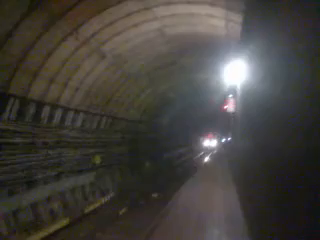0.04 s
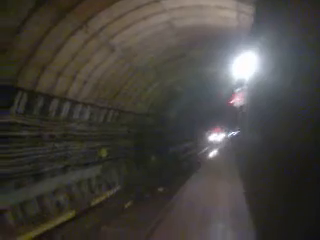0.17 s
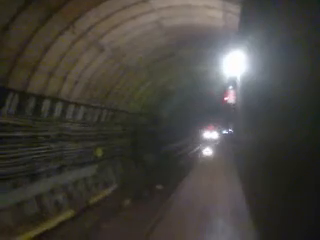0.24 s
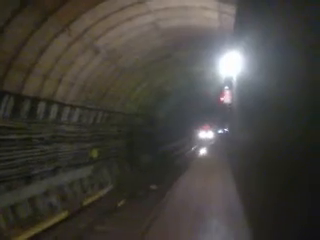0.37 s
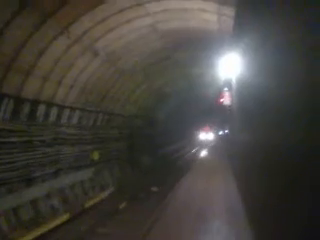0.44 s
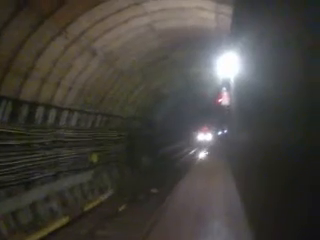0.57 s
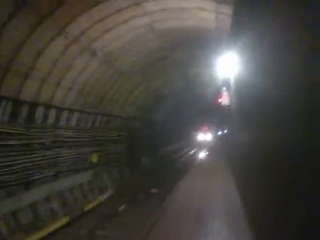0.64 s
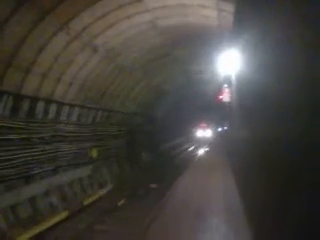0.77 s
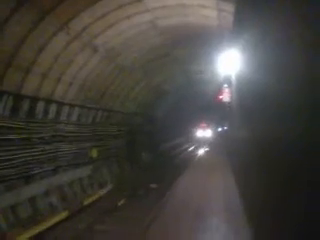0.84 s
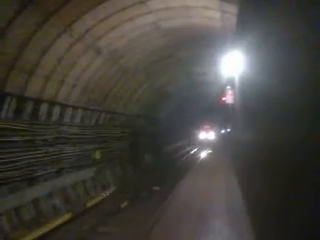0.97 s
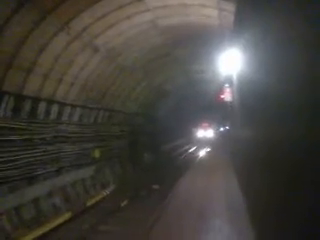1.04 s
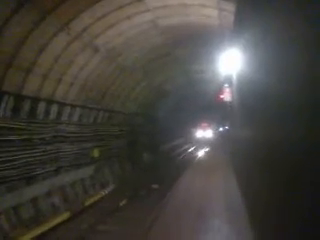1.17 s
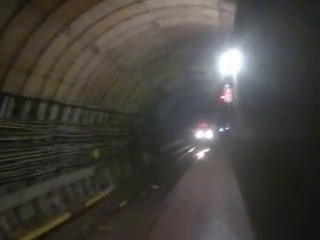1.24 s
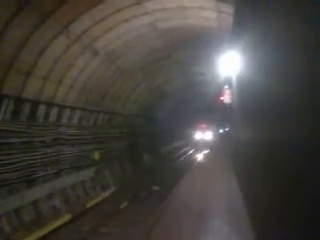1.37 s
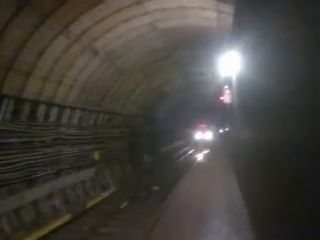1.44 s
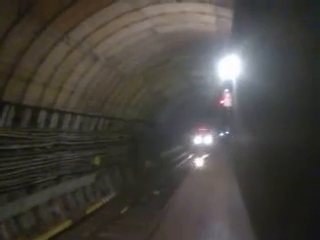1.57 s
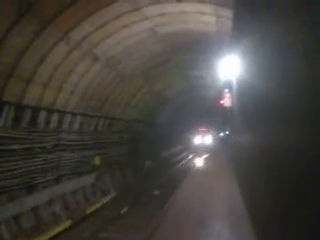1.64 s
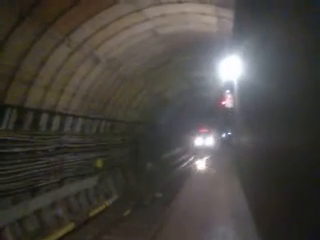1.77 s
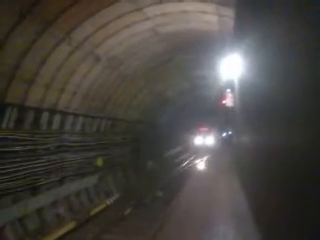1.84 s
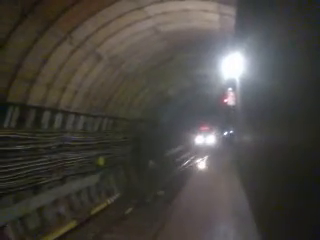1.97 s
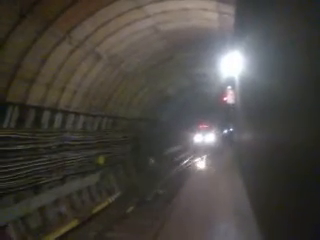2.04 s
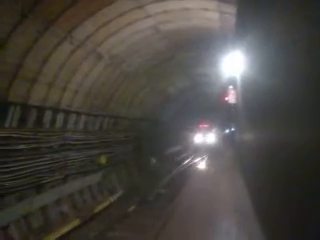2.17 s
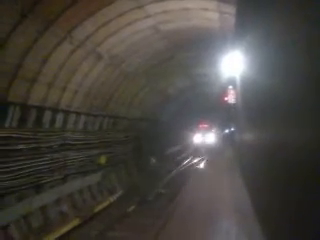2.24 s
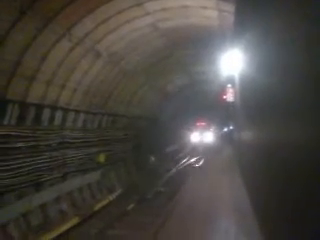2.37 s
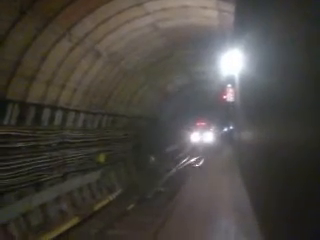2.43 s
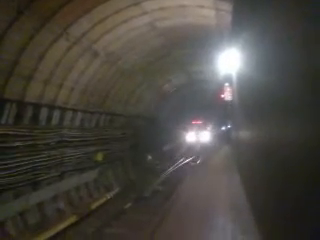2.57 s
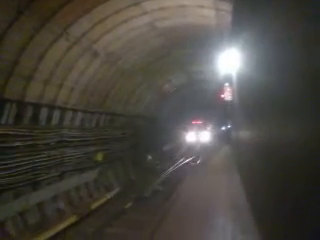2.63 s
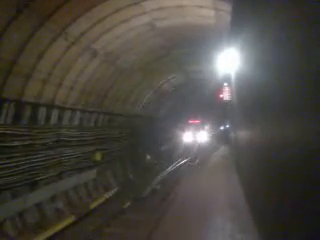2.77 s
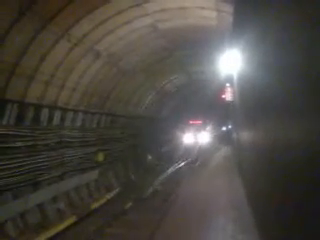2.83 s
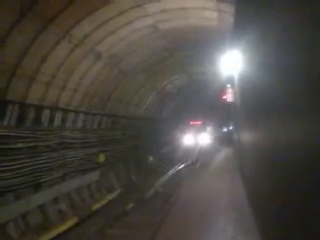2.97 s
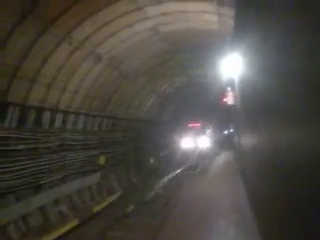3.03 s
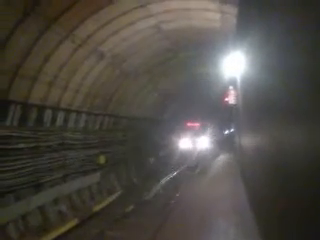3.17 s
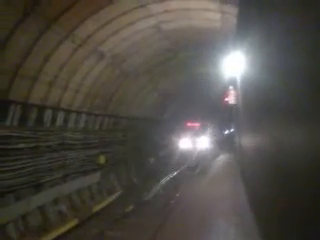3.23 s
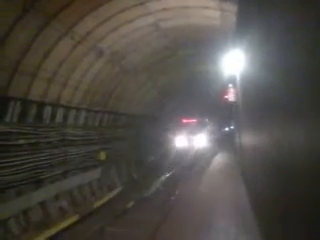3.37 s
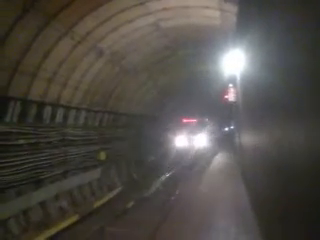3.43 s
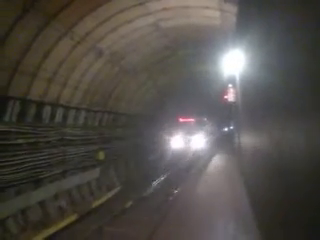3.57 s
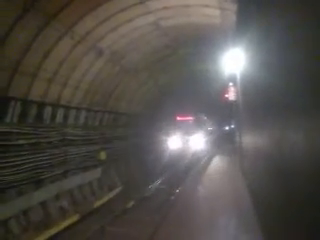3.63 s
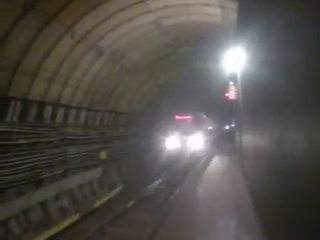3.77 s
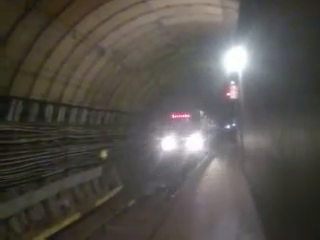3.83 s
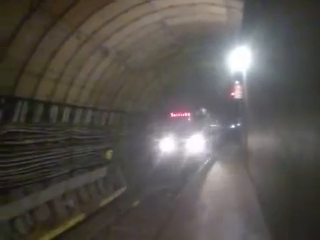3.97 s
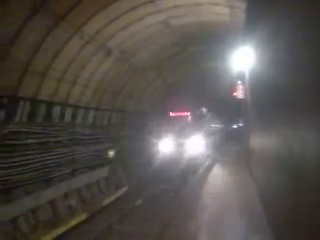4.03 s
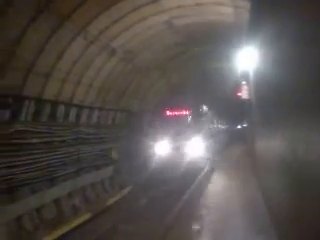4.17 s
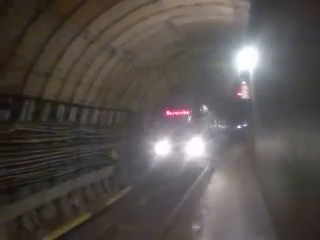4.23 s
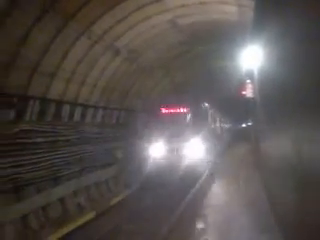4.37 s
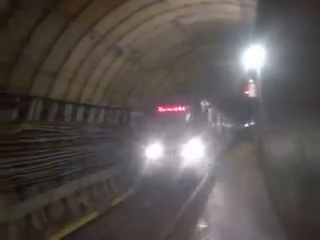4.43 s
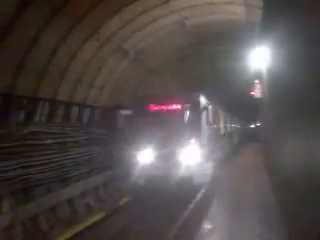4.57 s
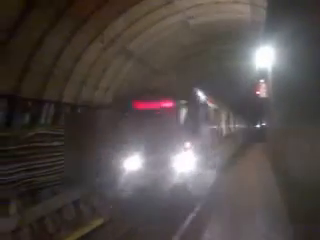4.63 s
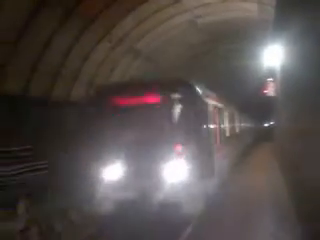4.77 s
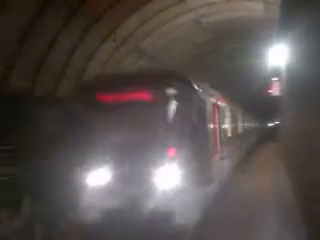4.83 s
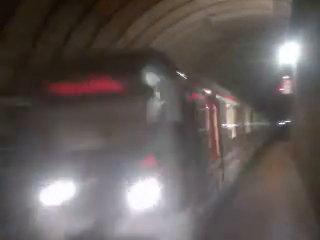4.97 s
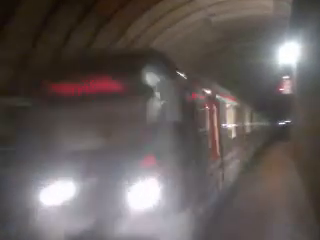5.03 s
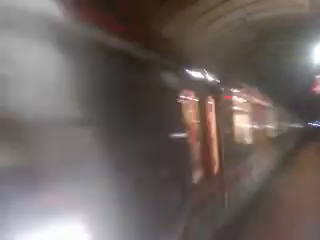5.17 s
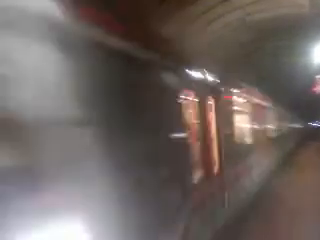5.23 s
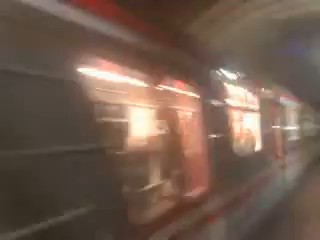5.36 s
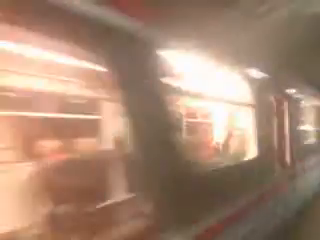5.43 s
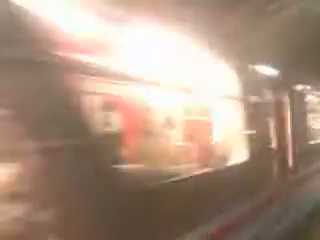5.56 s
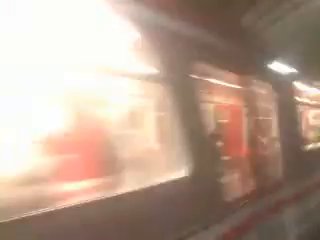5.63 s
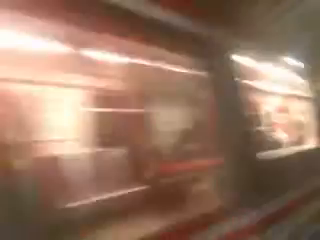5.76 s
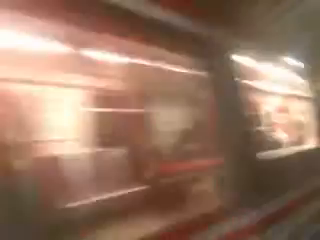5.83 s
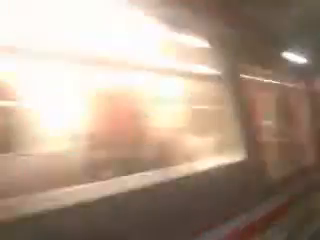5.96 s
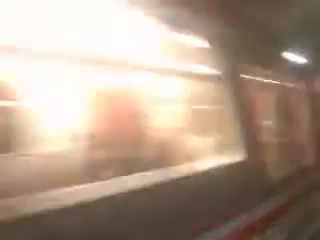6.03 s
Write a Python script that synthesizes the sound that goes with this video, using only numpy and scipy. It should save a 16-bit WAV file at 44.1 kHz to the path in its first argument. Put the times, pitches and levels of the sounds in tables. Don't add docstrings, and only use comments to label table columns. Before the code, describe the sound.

A train nears through an echoing round tunnel. At first there is deep wind buffeting, a faint falling motor hum and soft rail knocks. A hard clank starts a jump in loudness; thuds and metallic blows boom along the tunnel, scrapes hiss, and high converter whistling broadens. Finally the wheels roar right beside the small, overloading microphone, with heavy air thumps.

```python
import sys
import numpy as np
from scipy import signal
from scipy.fft import rfft, irfft
from scipy.io import wavfile
from scipy.ndimage import uniform_filter1d

SR = 44100
rng = np.random.default_rng(int(sys.argv[2]) if len(sys.argv) > 2 else 0)


def dump(signal):
    limited = np.clip(np.atleast_2d(signal).T, -1, 1)
    pcm = np.round(limited * 32767).astype(np.int16)
    wavfile.write(sys.argv[1], SR, pcm)


def nominal_scale(level):
    x = np.asarray(level, float) / 20
    return 10 ** x


N = 269451

# (time [s], level [dB])
GUSTS = [(0.0, -30.5), (0.54, -23.5), (1.1, -26.5), (1.41, -25.5), (1.77, -25), (2.07, -21), (2.52, -26),
         (2.94, -19), (3.44, -23), (4.81, -20.5), (5.72, -24), (6.11, -16)]
# (frequency [Hz], density [dB per Hz])
EDDY_SPECTRUM = [(8.8, -49), (15, -12.5), (32, -5), (49, 0), (97, -5.5), (198, -14), (260, -34), (340, -67),
                 (570, -120)]
# (time [s], level [dB], flange grind [dB])
ROLLING_LEVELS = [(0, -31.5, 1), (.2, -31.5, 1), (.95, -33, 0), (1.45, -27, -1.5), (1.75, -27.5, -0.5),
                  (2.45, -28.5, -1.5), (2.865, -24.5, -0.5), (2.885, -15, 0), (3.26, -21.5, -2),
                  (3.5, -17.5, 3.5), (3.82, -26, 1), (3.9, -19.5, -3), (4.02, -21.5, -2.5), (4.3, -20, -1),
                  (4.65, -17.5, -1), (5.2, -18.5, 3), (5.45, -16.5, -1), (6.11, -16, 1)]
ROLLING_CENTRES_HZ = (178, 700, 3000)
# (frequency [Hz], density [dB per Hz])
ROLLING_SPECTRUM = [(90, -14), (130, -0.5), (220, 1.5), (290, -2.5), (520, 0), (750, 3), (920, -4),
                    (1150, -0.5), (1700, -4), (2300, 1), (2900, -11.5), (4200, -16.5), (5500, -19.5),
                    (7200, -31.5)]
# (frequency [Hz], width [Hz], level [dB])
CLEAN_TONES = [
    (2490, 60, 0),
    (4975, 110, -7),
    (7478, 20, -30),
]
# (frequency [Hz], width [Hz], level [dB])
FIRST_SIDEBANDS = [(2412, 170, 2.5), (2267, 170, -1.5)]
# (frequency [Hz], width [Hz], level [dB])
UPPER_SIDEBANDS = [(4790, 280, -7.5), (4865, 400, -3), (4930, 1200, -9), (7160, 140, -8), (7210, 810, -3.5),
                   (8700, 350, 3)]
# (time [s], upper sideband level [dB])
CONVERTER_LOAD = [(0, -58.5), (2.0, -63), (2.9, -59.5), (4.0, -50), (4.5, -33.5), (5, -38), (5.4, -33),
                  (5.8, -26.5), (6.11, -27.5)]
# (middle [s], peak [dB], frequency [Hz])
PORT_THUMPS = [(0.264, -11.5, 72), (0.318, -11, 75), (0.354, -13.5, 94), (0.493, -10.5, 48.7),
               (0.559, -13.5, 58), (0.631, -15, 60), (0.762, -19, 76), (1.045, -13, 60.5),
               (1.322, -11.5, 75), (1.438, -10, 65.6), (1.599, -15, 71.5), (1.883, -6, 48.7),
               (1.919, -14, 67.6), (2.088, -16, 75), (2.242, -10, 55), (2.62, -15.5, 70.6),
               (2.663, -18, 58.4), (2.728, -17, 59.6), (2.79, -14, 60.6), (2.84, -16, 56),
               (2.902, -9, 83.6), (3.069, -7, 77.8), (4.423, -2.5, 56.8), (4.515, -16, 98),
               (4.612, -10, 93), (5.085, -8.5, 72), (5.189, -9.5, 59.5), (5.286, -7.5, 65.3),
               (5.348, -11, 99.5), (5.962, -13, 82.5)]
# (time [s], peak [dB], centre [Hz], width [Hz])
LOOSE_TICKS = [
    (0.4714, -19, 2400, 2400),
    (0.6485, -15, 650, 300),
    (0.9119, -30, 2500, 2500),
    (2.2394, -20, 800, 500),
]
# (time [s], clank [dB], thud [dB], knock [dB])
JOINT_BLOWS = [(0.5706, -36, -23, -35), (0.6719, -33, -29.5, -34), (0.9109, -32, -37, -33.5),
               (1.0745, -31, -29, -27.5), (1.3201, -23, -28, -24), (1.431, -26, -22.5, -19),
               (1.5993, -17, -32, -24), (1.8364, -26, -18.5, -22.5), (1.9119, -23, -30, -21.5),
               (2.2386, -18, -28.5, -20.5), (2.5284, -22, -31, -33), (2.59, -5.5, -23, -19),
               (2.8764, -3.5, -10, -8), (3.037, -12.5, -8, -12), (3.1311, -12.5, -6, -13.5),
               (3.2973, -10.5, -11, -16.5), (3.373, -13, -5.5, -20.5), (3.4904, -4, -9.5, -14.5),
               (3.7361, -2.5, -19.5, -29), (3.8627, -25, -10.5, -20.5), (4.0374, -18, -7, -10),
               (4.3771, -17.5, -10.5, -17), (4.4644, -6.5, -6, -16), (4.5344, -2, -16, -14),
               (4.9132, -8.5, -5, -7.5), (5.0777, -2.5, -18.5, -10), (5.3272, -11.5, -9, -14),
               (5.4815, -18, -11, -11.5), (5.7003, -12.5, -11, -22), (5.9384, -9.5, -8, -9)]
# (middle [s], half length [s], frequency [Hz], width [Hz], level [dB])
FLANGE_SCRAPES = [(1.922, .11, 3035, 172.8, -31), (2.05, 0.075, 3000, 300, -35),
                  (3.6, 0.11, 2000, 59.7, -31), (5.799, 0.16, 1900, 88.5, -39),
                  (1.915, 0.079, 1730, 1389, -28), (2.925, 0.054, 2110, 885, -20.5),
                  (2.60, 0.088, 2140, 700, -27), (2.658, 0.15, 4400, 2315, -43),
                  (3.2, 0.052, 900, 905, -29), (2.99, 0.042, 177, 72, -8.5), (2.9, 0.019, 230, 65, -12),
                  (4.159, 0.084, 230, 71, -14.5), (3.345, 0.031, 1257, 700, -19.5),
                  (3.505, 0.083, 5100, 830, -35.5), (3.2, 0.073, 2100, 610, -24.5),
                  (3.821, 0.11, 3120, 700, -31), (3.1, 0.037, 2274, 900, -18),
                  (4.481, 0.037, 5100, 410, -30.5), (4.486, 0.04, 6400, 890, -32.5),
                  (4.523, 0.05, 2360, 123, -21.5), (4.548, 0.098, 1800, 430, -23),
                  (4.95, 0.026, 940, 760, -21), (5.098, 0.057, 1860, 980, -16),
                  (5.338, 0.029, 896, 750, -16.5)]


def rms_one(x):
    return x / np.sqrt(np.mean(x ** 2) + 1e-20)


def in_time(rows):
    time_s, *columns = np.transpose(rows)
    return [np.interp(np.arange(N) / SR, time_s, column) for column in columns]


def at_hz(points, hz):
    point_hz, point_db = np.transpose(points)
    return np.interp(np.log(hz), np.log(point_hz), point_db)


def drift(rate_hz):
    r = np.exp(-80 * np.pi * rate_hz / SR)
    white = rng.standard_normal(N // 40 + 2002)
    slow = signal.lfilter([1], [1, -2 * r, r * r], white)[2000:]
    return np.interp(np.arange(N) / 40, np.arange(len(slow)), rms_one(slow))


def band(x, low_hz, high_hz):
    edges_hz = [low_hz, min(high_hz, .45 * SR)]
    return signal.sosfilt(signal.butter(2, edges_hz, "band", fs=SR, output="sos"), x)


def resonance(x, hz, width_hz):
    r = np.exp(-np.pi * width_hz / SR)
    gain = (1 - r * r) / 2
    return signal.lfilter([gain, 0, -gain], [1, -2 * r * np.cos(2 * np.pi * hz / SR), r * r], x)


def coloured(spectrum):
    hz = np.maximum(np.fft.rfftfreq(N, 1 / SR), 1)
    return rms_one(irfft(rfft(rng.standard_normal(N)) * nominal_scale(at_hz(spectrum, hz)), N))


def buffet():
    level_db, = in_time(GUSTS)
    eddies = coloured([(8, -40)] + list(EDDY_SPECTRUM) + [(600, -70)])
    evened = eddies / np.sqrt(.15 + uniform_filter1d(eddies ** 2, size=2600))
    lumpy = evened * nominal_scale(0.59 * drift(4.4))
    return nominal_scale(level_db) * rms_one(lumpy)


def rolling_levels_db():
    near_slab_s, boom_far_db, boom_near_db = 2.875, -5.5, 4
    ring_start_db, ring_rise_db_per_s, ring_full_s = -44, 6.0, 3.65
    boom_tilt, ring_tilt, ring_follows, roar_db = 1.1, 1, 0.63, -1
    t = np.arange(N) / SR
    roll_db, grind_db = in_time(ROLLING_LEVELS)
    boom_db = roll_db - boom_tilt * grind_db + np.where(t < near_slab_s, boom_far_db, boom_near_db)
    swing_db = roll_db - uniform_filter1d(roll_db, size=SR, mode="nearest")
    nearness_db = ring_start_db + ring_rise_db_per_s * np.minimum(t, ring_full_s)
    ring_db = nearness_db + ring_follows * swing_db + ring_tilt * grind_db
    return np.array([boom_db, roll_db + roar_db, ring_db])


def rolling():
    centres_hz = np.array(ROLLING_CENTRES_HZ)
    width_db = 10 * np.log10(centres_hz * [1.0, 1.3, .5])
    density_db = rolling_levels_db() - width_db[:, None]
    edges_hz = 90 * 2 ** np.arange(0, 6.7, 1 / 3)
    white = rng.standard_normal((2, N))
    together = drift(12)
    out = np.zeros(N)
    for k, (low_hz, high_hz) in enumerate(zip(edges_hz, edges_hz[1:])):
        hz = np.sqrt(low_hz * high_hz)
        place = np.interp(np.log(hz), np.log(centres_hz), [0, 1, 2])
        shares = np.maximum(1 - abs(place - np.arange(3)), 0)
        level_db = shares @ density_db + at_hz(ROLLING_SPECTRUM, hz)
        flicker_db = 0.99 * together + 0.7 * drift(18.0) + 0.5
        out += nominal_scale(level_db + flicker_db) * band(white[k % 2], low_hz, high_hz)
    return out * np.sqrt(SR / 2)


def motor():
    start_hz, fall_hz_per_s = 591, 24
    start_db, rise_db_per_s = -37, 0.84
    t = np.arange(N) / SR
    level_db = start_db + rise_db_per_s * t
    hz = start_hz - fall_hz_per_s * t
    fade = np.clip((3.2 - t) / 0.45, 0, 1)
    first = np.sin(2 * np.pi * np.cumsum(hz + 6 * drift(20)) / SR)
    second = np.sin(2 * np.pi * np.cumsum(1.075 * hz + 14 * drift(20)) / SR)
    both = nominal_scale(2.5 * drift(14)) * first + nominal_scale(-9 + 3 * drift(7)) * second
    return np.sqrt(2) * fade * nominal_scale(level_db) * both


def converter():
    tone_start_db, tone_rise_db_per_s = -49.5, 3.7
    tone_ends_s, tone_fall_db_per_s = 3.5, 3.5
    cluster_start_db, cluster_rise_db_per_s = -52, 3.5
    overtone_fade_db_per_s = 2.5
    t = np.arange(N) / SR
    rise_db = tone_rise_db_per_s * np.minimum(t, tone_ends_s)
    fall_db = tone_fall_db_per_s * np.maximum(t - tone_ends_s, 0)
    tone_db = tone_start_db + rise_db - fall_db + 3.1 * drift(5.0)
    first_db = cluster_start_db + cluster_rise_db_per_s * t
    upper_db, = in_time(CONVERTER_LOAD)
    groups = [(tone_db, CLEAN_TONES, overtone_fade_db_per_s),
              (first_db, FIRST_SIDEBANDS, 0),
              (upper_db, UPPER_SIDEBANDS, 0)]
    out = np.zeros(N)
    for level_db, modes, fade_db_per_s in groups:
        for hz, width_hz, mode_db in modes:
            fade_db = fade_db_per_s * t if mode_db < 0 else 0
            once = resonance(rng.standard_normal(N), hz, width_hz)
            out += nominal_scale(level_db + mode_db - fade_db) * rms_one(resonance(once, hz, width_hz))
    return out


def thumps():
    half = SR // 20
    out, t = np.zeros(N), np.arange(-half, half) / SR
    for middle_s, peak_db, hz in PORT_THUMPS:
        shape = np.exp(-(t * hz / 0.53) ** 2)
        start = round(middle_s * SR) - half
        out[start:][:len(t)] -= nominal_scale(peak_db + 2.0) * shape * np.sin(2 * np.pi * hz * t)
    return out


def ticks():
    out, contact = np.zeros(N), signal.unit_impulse(600)
    for time_s, peak_db, hz, width_hz in LOOSE_TICKS:
        snap = resonance(resonance(contact, hz, width_hz), hz, 2 * width_hz)
        out[round(time_s * SR):][:600] += nominal_scale(peak_db) * snap / abs(snap).max()
    return out


def joints():
    clank_hz, tunnel_t60_s = 1980, 0.49
    out, t = np.zeros(N + SR), np.arange(SR) / SR
    for time_s, clank_db, thud_db, knock_db in JOINT_BLOWS:
        white = rng.standard_normal(SR)
        thud = band(white, 115, 256) + .6 * resonance(white, 205, 50)
        knock = band(white, 230, 1070)
        clank = resonance(resonance(white, clank_hz, 1600), clank_hz, 1600)
        clank = clank + .08 * band(white, 1500, 6900)
        # (sound, level [dB], T60 [s], rise [s])
        parts = [(thud, thud_db - 2, 1.5 * tunnel_t60_s, .006),
                 (knock, knock_db - 2.5, 1.44 * tunnel_t60_s, .003),
                 (clank, clank_db - 16, 0.51 * tunnel_t60_s, .005)]
        for sound, level_db, t60_s, rise_s in parts:
            shape = (1 - np.exp(-t / rise_s)) * nominal_scale(-60 * t / t60_s)
            out[round(time_s * SR):][:SR] += nominal_scale(level_db) * rms_one(sound) * shape
    return out[:N]


def scrapes():
    half = SR // 4
    out, t = np.zeros(N), np.arange(-half, half) / SR
    for middle_s, half_s, hz, width_hz, level_db in FLANGE_SCRAPES:
        white = rng.standard_normal(len(t))
        ringing = rms_one(resonance(resonance(white, hz, width_hz), hz, width_hz))
        swell = np.exp(-abs(t / half_s) ** 3)
        out[round(middle_s * SR) - half:][:len(t)] += nominal_scale(level_db) * ringing * swell
    return out


def scene():
    air = buffet() + thumps()
    wheels = rolling() + joints() + scrapes() + ticks()
    drive = motor() + converter()
    return (air + wheels + drive)[None]


def band_limit(x):
    return signal.sosfilt(signal.butter(12, 15870, fs=SR, output="sos"), x)


def record(dry):
    overload, ceiling = 1.15, .715
    top_opens_db, top_db = -12, -20
    squashed = overload * np.tanh(dry / overload)
    cut = signal.sosfilt(signal.cheby2(10, 36, 7680, fs=SR, output="sos"), squashed)
    cut = signal.sosfilt(signal.butter(6, 9300, fs=SR, output="sos"), cut)
    level_db = 10 * np.log10(uniform_filter1d(squashed ** 2, size=3000) + 1e-12)
    gate = np.clip((level_db - top_opens_db) / 2, 0, 1)
    top = band(band(squashed, 7400, 8300), 7400, 8300) * gate
    clipped = np.clip(cut + nominal_scale(top_db) * top, -ceiling, ceiling)
    return band_limit(clipped)


dry = scene()
out = record(dry)
dump(out)
```